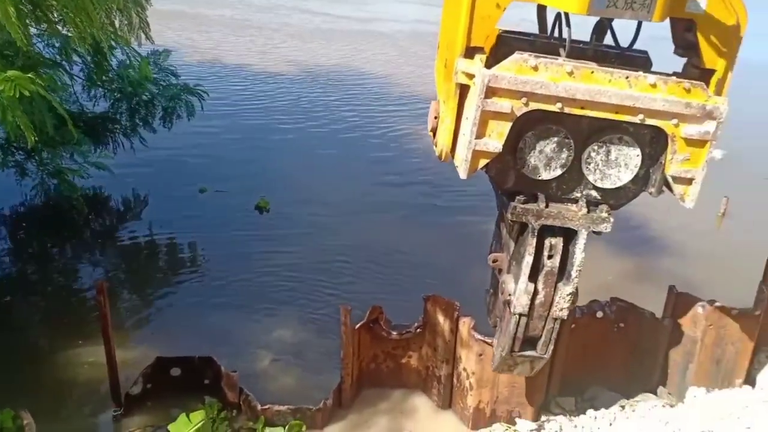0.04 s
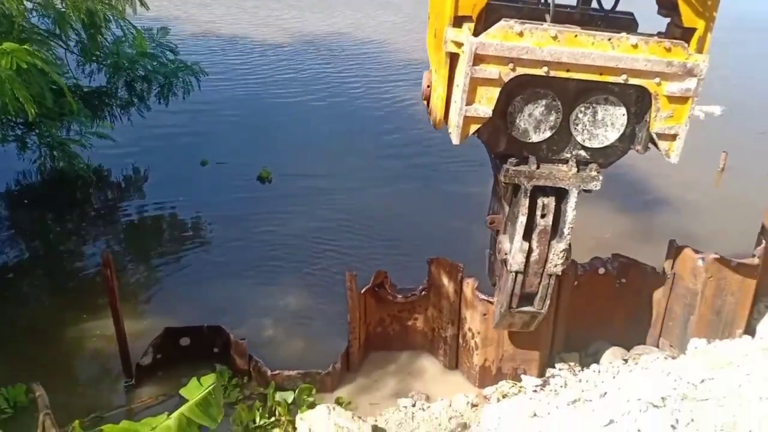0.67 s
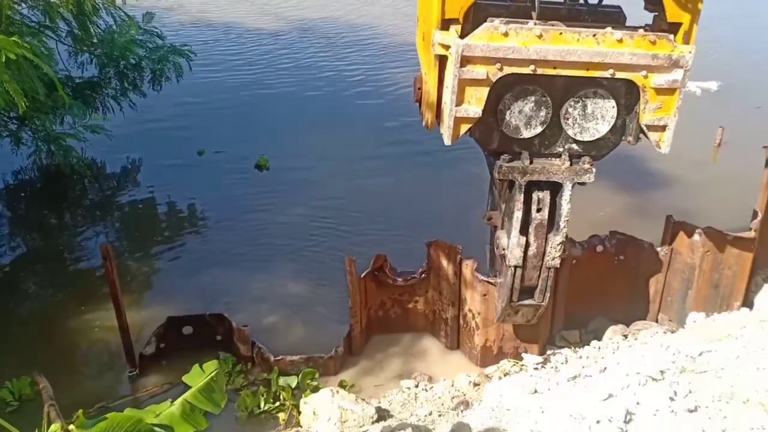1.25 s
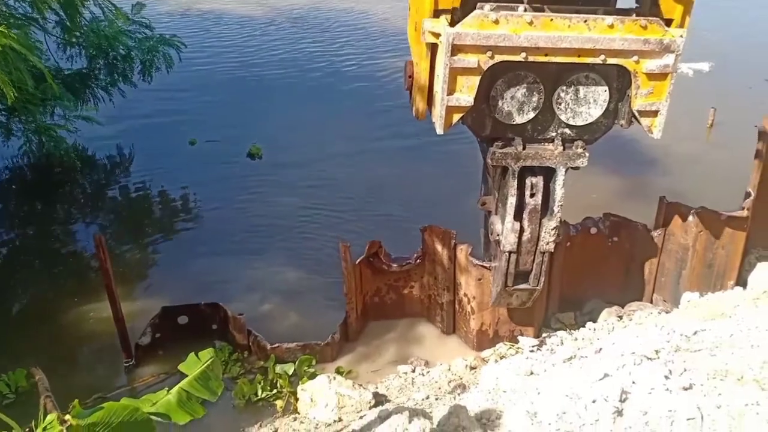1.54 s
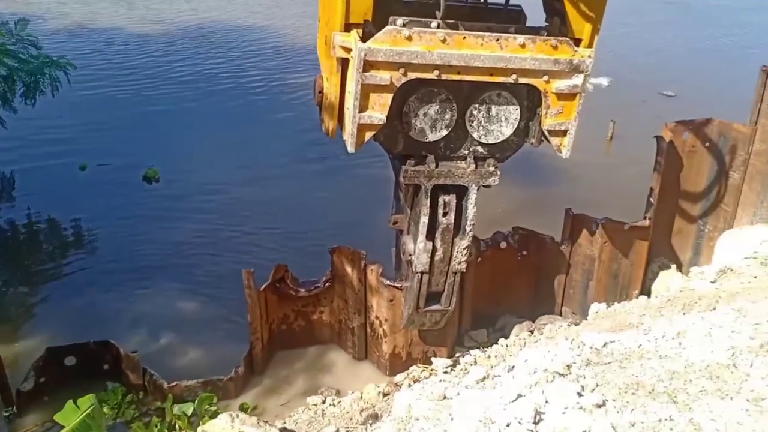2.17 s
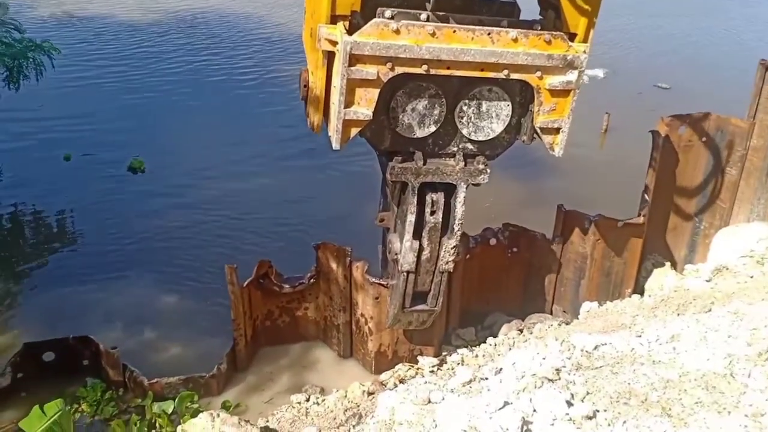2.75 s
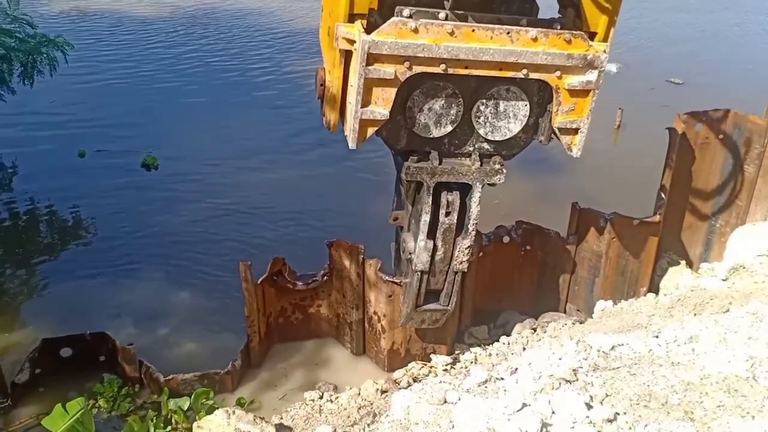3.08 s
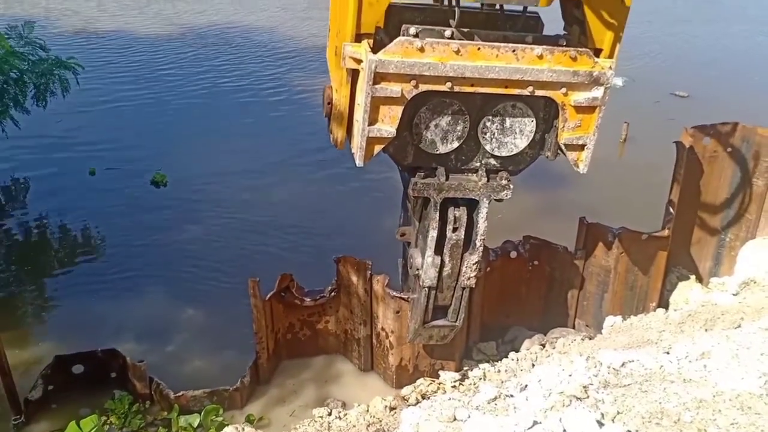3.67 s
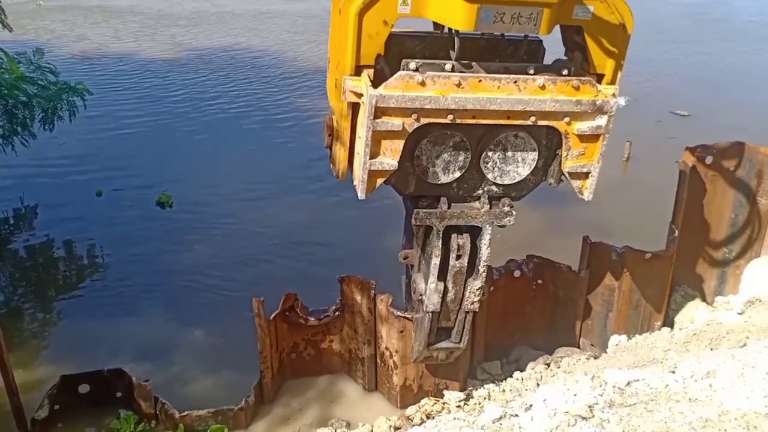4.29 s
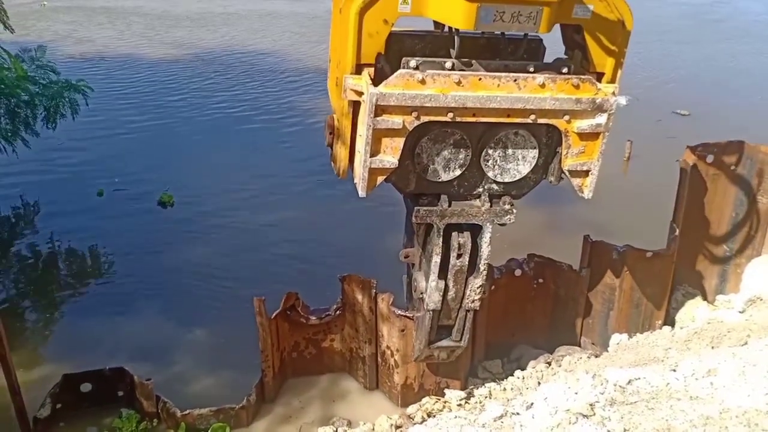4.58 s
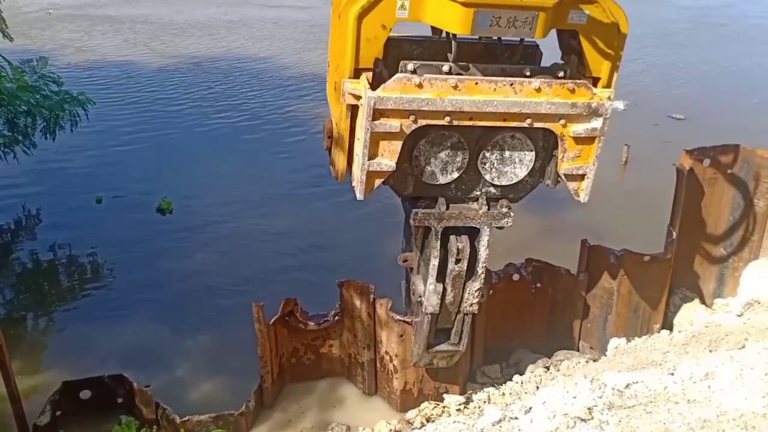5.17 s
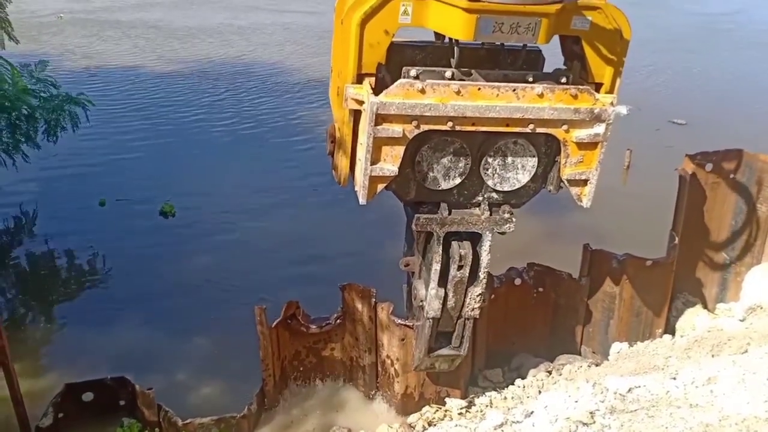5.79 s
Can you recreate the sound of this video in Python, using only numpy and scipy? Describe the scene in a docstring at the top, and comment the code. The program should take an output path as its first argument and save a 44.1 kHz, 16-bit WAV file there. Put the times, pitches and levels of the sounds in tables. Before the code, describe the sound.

An excavator runs steadily on a river bank, its diesel throbbing under a wavering hydraulic hum and whine. In front of the microphone, the pile driver's jaw knocks on a steel sheet pile, squeaks and rattles. More ringing knocks, crunchy scrapes and dull thuds follow, with two very faint distant chirps. Then the steel grinds louder, gives a few short squeaks and breaks into a quick judder.

```python
"""An excavator idles on a river bank: its diesel throbs and its hydraulic pump hums off to the left.
Almost at once the jaw of its pile driver knocks on a steel sheet pile, squeaks and rattles in its play.
More knocks, scrapes and dull thuds follow as it is worked on; twice a faint chirp comes from afar.
From 3.5 s the jaw bears down and the steel grinds, with a few short squeaks just after 5 s.
At 5.3 s the grind breaks into a judder of quick slips."""
import sys
import numpy as np
from scipy import signal
from scipy.fft import rfft, irfft
from scipy.io import wavfile
from scipy.ndimage import uniform_filter1d

SR = 44100
rng = np.random.default_rng(int(sys.argv[2]) if len(sys.argv) > 2 else 0)


def transcribe(u):
    """Save the signal u as a 16-bit wav file named by the first command-line argument.

    u: samples, shape (n,) or (channels, n), limited to [-1, 1]; the rate is SR.
    q: integer samples, one column per channel.
    """
    v = np.clip(np.atleast_2d(u).T, -1, 1)
    q = np.round(v * 32767).astype(np.int16)
    wavfile.write(sys.argv[1], SR, q)


N = 257103
T = np.arange(N) / SR
HZ = np.arange(N // 2 + 1) * SR / N
TOP_HZ = 15650

# square hits of the jaw and their rebounds: (time [s], level [dB], treble [dB], t60 [s], note [Hz])
JAW_KNOCKS = [(0.279, -17.5, -14, 0.083, 1840), (.322, -10, -15, 0.12, 540), (.36, -19, -18, 0.084, 1982),
              (.386, -21, -28, 0.073, 1604), (.399, -26, -22, 0.049, 1982), (0.465, -32.5, -23, .07, 1640),
              (0.704, -29.5, -19, .1, 1500), (.761, -14, -6.5, .13, 2410), (1.219, -19, -3.5, .13, 1174),
              (1.315, -18, -7, 0.16, 2120), (1.404, -15, 0.5, .13, 2134), (1.472, -27.5, -11, 0.092, 1980),
              (1.516, -9.5, 0.5, .13, 2686), (1.58, -26.5, -13, 0.11, 1725),
              (1.618, -22.5, -30, 0.18, 2330), (1.863, -23.5, 4, 0.084, 1642), (2.714, -23, -10, .14, 1750),
              (3.746, -22, -3, 0.12, 1868), (3.862, -27.5, -2, 0.084, 1420), (3.959, -28, -8, .07, 1740),
              (4.203, -32, -2, .07, 1610), (4.291, -25.5, 0, 0.11, 2218), (4.736, -21, 5.5, .055, 1780),
              (5.01, -27, -7, .08, 1680)]
# bright, crunchy skids: (time [s], level [dB], bass [dB], treble [dB], t60 [s], note [Hz])
JAW_SCRAPES = [(1.829, -28, -6, 7, 0.13, 1650), (1.855, -29, 0, 7, 0.11, 5080),
               (2.706, -15.5, 6.5, 2, 0.092, 2180), (3.662, -14, 6, 5, 0.13, 1680),
               (3.738, -28, -4, 0, .15, 2660), (3.858, -29, -11, -4, .12, 3020),
               (4.292, -28.5, -19, 1, .09, 2640), (4.432, -13.5, 0, 8.5, 0.13, 2550)]
# dull, pitched thuds as the pile shifts in the ground: (time [s], level [dB], t60 [s], note [Hz])
PILE_THUDS = [(.324, -24.5, 0.09, 851), (.358, -28, 0.06, 698), (.403, -30.5, 0.05, 572),
              (1.522, -22.5, 0.092, 528), (1.633, -27.5, .13, 1230), (2.148, -39, .12, 1370),
              (2.738, -35, .15, 850), (2.775, -37.5, 0.25, 1296), (4.118, -25.5, 0.092, 430.5),
              (4.441, -28, 0.11, 528), (4.465, -26, 0.24, 426)]
# steel sticking and slipping: (time [s], length [s], pitch [Hz], level [dB], relative octave level [dB])
STEEL_SQUEAKS = [(0.326, 0.094, 2884, -17.5, -32), (0.325, 0.055, 2330, -18, -43),
                 (.385, .03, 2335, -22.5, -43), (0.35, 0.061, 4370, -41, -35),
                 (5.057, .022, 2490, -23.5, -5), (5.1065, .0095, 2975, -13, -11),
                 (5.118, 0.011, 2940, -29, -5), (5.1532, 0.008, 3030, -15, -11.5)]
# the jaw rattling in its play: (time [s], level [dB])
JAW_CLINKS = [(.3235, -22), (.466, -37), (.555, -40.5), (1.62, -43), (1.645, -33), (1.857, -32),
              (1.872, -36)]
# swell of the grind as the jaw bears down: (time [s], level [dB])
GRIND_SWELL = [(3.5, -45), (3.9, -29), (4.25, -40), (4.75, -26), (5.1, -25), (5.35, -24), (5.65, -21.5),
               (5.83, -22.5)]
# tones in the clack of a slip: (frequency [Hz], level [dB])
CLACK_TONES = [(1705, -8), (1820, -4), (2065, 1.5), (2200, -3), (2600, -8)]
# loudness of the diesel: (time [s], level [dB])
ENGINE_LEVEL = [(0, -33.5), (.7, -33.5), (1.3, -29.5), (1.8, -31), (2.2, -29.5), (5.83, -28.5)]
# exhaust tones: (multiple of the crank rate [x], relative level [dB])
EXHAUST_TONES = [(2, 0.5), (3, -14.5), (4, 1), (5, -3.5), (6, -15.5), (7, -28), (8, -10), (11, -13),
                 (16, -59.5)]
# the pump's voice as its pressure shifts: (time [s], hum [dB], whine [dB])
PUMP_LEVELS = [(0, -33, -45), (.2, -35, -39), (.55, -36, -36), (1.55, -35, -33), (2.0, -31.5, -34),
               (2.13, -30.5, -29), (2.62, -30.5, -29.5), (2.85, -39.5, -29), (3.5, -34, -28.5),
               (3.95, -38, -28.5), (4.45, -37, -26), (4.68, -39.5, -37.5), (4.8, -42, -28), (5.2, -42, -27),
               (5.83, -41, -26.5)]
# high chirps: (time [s], length [s], first pitch [Hz], last pitch [Hz], level [dB])
FAR_CHIRPS = [(0.938, .036, 5900, 5750, -54), (3.022, .036, 5700, 6100, -52)]

# ringing steel of pile, jaw and engine casing: (frequency [Hz], level [dB], t60 [s])
PILE_MODES = [(440, -2, 0.34), (517, -8.5, 0.2), (695.3, -6, 0.51), (818, 0, 0.38), (947, -2.5, 0.18),
              (1166, -12.5, 0.65), (1332, -5, 0.26), (1732, 5.5, 0.069), (2078, 1, 0.099),
              (2162, 1.5, 0.09), (2190, -13, 0.084), (2580, -7, 0.06), (3870, -6, 0.06), (5120, -11, 0.04)]
JAW_MODES = [(693, -2, 0.39), (851, -5, 0.25), (1604, -3, 0.18), (1982, -2, 0.25), (2330, 4, 0.12),
             (2890, 0, 0.23), (3525, -26, .2), (4300, -24, .2), (5109, -20, .12)]
CASING_MODES = [(1063, 1, 0.56), (1700, -22, 0.17), (1860, -1, 0.16), (2007, 0, 0.19), (2150, -6.5, 0.27),
                (2585, -6, 0.42), (3820, -10.5, 0.087), (5130, -2.5, 0.043)]

# EQ curves of the noise layers: (frequency [Hz], relative level [dB])
CRACK_EQ = [(30, -32), (100, -10), (330, -13.5), (500, 0.5), (750, -2), (1100, 0), (1500, -6), (2300, 3),
            (2800, -6), (3300, -11.5), (4200, -15.5), (5200, -11.5), (6500, -21.5), (9000, -36),
            (15000, -31.5)]  # dry crack of a blow
GRIND_EQ = [(30, -14), (100, 8), (200, 5.5), (330, -7), (450, 8), (620, 3.5), (740, -5.5), (880, 10),
            (1100, -3), (1700, -3), (2100, -3.5), (2700, -5), (3400, -17), (5500, -27), (9000, -51),
            (15000, -67)]  # steel grinding under load
SLIP_EQ = [(300, -20.5), (900, 6), (1200, -8), (1480, -1), (1710, 0.5), (1900, -11), (2070, 1), (2300, -6),
           (2700, -4), (3300, -24.5), (5500, -22), (9000, -47)]  # bite of a slip
SLIP_THUD_EQ = [(30, -32), (100, -9), (220, 4), (330, -6), (480, 1), (600, 13), (720, -3), (860, 1),
                (1200, -12.5), (3000, -54)]  # the pile's answer to a slip
RUMBLE_EQ = [(20, -48), (45, -21), (70, -11.5), (105, -11.5), (150, -2), (200, -5.5), (270, -5),
             (340, -9.5), (450, -7.5), (600, -10.5), (800, -14), (1100, -28.5), (2500, -62.5)]  # low body of the diesel
CLATTER_EQ = [(300, -34), (800, 0), (1200, 0), (1600, -1), (2150, -1), (2700, -6), (3400, -13.5),
              (4300, -15), (5500, -12), (6600, -19.5), (8000, -27.5), (10000, -30), (13000, -24.5),
              (16000, -24.5)]  # its hard mechanical top


def blows():
    """Each blow is a crush of tiny impacts: a dry crack, the struck spot's tones and the pile's ring."""
    grit = air(scatter=1.0, corner_hz=1160) * unit(undb(2.0 * walk(700)))
    treble = signal.sosfiltfilt(signal.butter(2, 3600, "high", fs=SR, output="sos"), grit)
    bass = signal.sosfiltfilt(signal.butter(2, 850, fs=SR, output="sos"), grit)
    crack, notes = np.zeros((2, N)), np.zeros(N)
    jitter = 0.79 * walk(250)
    for start, db, rise, t60, bass_db, treble_db, note_hz, note_db in blow_cues():
        span = slice(int(start * SR), int(start * SR) + SR // 2)
        force = undb(db) * contact(start, rise, t60)[span]
        shelves = (undb(bass_db) - 1) * bass[:, span] + (undb(treble_db) - 1) * treble[:, span]
        crack[:, span] += force * (grit[:, span] + shelves)
        # every spot on the pile has its own clang and one main note
        clang = undb(-10.5) * partials(low_hz=959.4, high_hz=2868, count=6)
        clang += undb(treble_db - 22) * partials(low_hz=3400, high_hz=5600, count=4)
        note = undb(note_db) * np.sin(2 * np.pi * note_hz * T[span] + jitter[span])
        notes[span] += force * (clang + note)
    sound = undb(-2.5) * colour(crack, CRACK_EQ) + undb(1.5) * notes
    sound += undb(-11.5) * ring(crack, PILE_MODES)
    return place(sound, lag_ms=0.077, pan_db=-3.0)


def blow_cues():
    """Knocks snap, and ring purer when light; scrapes ease in; thuds are bassy with a strong note."""
    knock_rise_s, scrape_rise_s, thud_rise_s = 0.0017, 0.011, 0.008
    # (time [s], level [dB], rise [s], t60 [s], bass [dB], treble [dB], note [Hz], note level [dB])
    for start, db, treble_db, t60, hz in JAW_KNOCKS:
        yield start, db, knock_rise_s, t60, -2, treble_db, hz, -11.5 - 0.3225 * db
    for start, db, bass_db, treble_db, t60, hz in JAW_SCRAPES:
        yield start, db, scrape_rise_s, t60, bass_db, treble_db, hz, -5.5
    for start, db, t60, hz in PILE_THUDS:
        yield start, db - 5, thud_rise_s, t60, 18, -9, hz, 8


def grinding():
    """Loaded steel grinds, then slips about 24 times a second; the pile thuds just after each slip."""
    grit = air(scatter=0.4, corner_hz=1010) * unit(undb(1.8 * walk(400)))
    run = judder()
    steady = grit * undb(curve(GRIND_SWELL) + 0.47 * walk(20))
    slips = grit * sum(undb(db) * contact(start, rise=0.004, t60=0.07) for start, db, _ in run)
    thuds = grit * sum(undb(db) * contact(start, rise=0.014, t60=0.066) for start, _, db in run)
    sound = undb(-2.5) * colour(steady, GRIND_EQ) + undb(-8.5) * ring(steady, PILE_MODES)
    sound += undb(-2.5) * colour(slips, SLIP_EQ) + undb(-7.5) * clacks(run)
    sound += undb(-3.5) * colour(thuds, SLIP_THUD_EQ)
    return place(sound, lag_ms=0.056, pan_db=-2.5)


def judder():
    """Quickening slips that bite, hold and fade: (time [s], slip level [dB], thud level [dB])."""
    start_s, gap_s, quicken_s, hold_s = 5.312, 0.043, 0.0004, 0.22
    peak_db, fade_db_per_s, depth_db = -15, 118, 15
    slip = np.arange(13)
    age = gap_s * slip - quicken_s * slip * (slip - 1) / 2
    drop_db = np.clip(fade_db_per_s * (age - hold_s), 0, depth_db)
    drop_db[0] += 8.5  # the first slip is softer
    return list(zip(start_s + age, peak_db - drop_db, peak_db - 0.36 * drop_db))


def clacks(run):
    """Each slip chatters on the steel for a moment, at a slightly different spot."""
    out, jitter = np.zeros(N), 0.75 * walk(250)
    for start, db, _ in run:
        span = slice(int(start * SR), int(start * SR) + SR // 4)
        # two staggered attacks hold the peak for about 5 ms
        force = np.maximum(contact(start, rise=0.005, t60=0.059), contact(start, rise=0.01, t60=0.059))
        for hz, tone_db in CLACK_TONES:
            detune, offset = rng.standard_normal(2)
            cycles = hz * (1 + 0.011 * detune) * (T[span] - start) + offset
            out[span] += undb(db + tone_db) * force[span] * np.sin(2 * np.pi * cycles + jitter[span])
    return out


def squeaks():
    """The sliding jaw locks on to one note; stick-slip adds overtones and the steel rings on."""
    rise_s, fade_db = 0.0043, 9
    out = np.zeros(N)
    waver, rough = walk(700), undb(1.1 * walk(250))
    for start, length, hz, db, octave_db in STEEL_SQUEAKS:
        along = np.clip((T - start) / length, 0, 1)
        attack, release = np.clip((T - start) / rise_s, 0, 1), np.clip(3.5 * (1 - along), 0, 1)
        grip = attack * release * undb(db - fade_db * along)
        tail = undb(db - fade_db - 9) * contact(start + length / 2, rise=length / 2, t60=0.07)
        # the pitch is sharp and unsteady until the grip settles
        sharp = 0.02 * contact(start, rise=0.001, t60=0.012)
        unsteady = 0.002 + 0.016 * contact(start, rise=0.002, t60=0.1)
        phase = 2 * np.pi * hz * np.cumsum(1 + sharp + unsteady * waver) / SR
        upper = sum(np.sin(k * phase) for k in range(3, 6) if k * hz < TOP_HZ)
        overtones = undb(octave_db) * (np.sin(2 * phase) + undb(-25) * upper)
        out += (grip + tail) * (np.sin(phase) + overtones)
    return place(np.sqrt(2) * out * rough, lag_ms=0.071, pan_db=-9.5)


def clinks():
    """The loose jaw hits its stops and rings."""
    rattle = sum(undb(db) * strike(JAW_MODES, start) for start, db in JAW_CLINKS)
    return place(rattle, lag_ms=0.062, pan_db=-5.5)


def diesel(turns):
    """Four cylinders, two firings a turn: exhaust tones, puffs of rumble, clatter ringing the casing."""
    tones = sum(undb(db + 0.14 * walk(5.4)) * np.sin(2 * np.pi * (multiple * turns + rng.random()))
                for multiple, db in EXHAUST_TONES)
    firing, uneven = np.cos(4 * np.pi * turns), np.cos(2 * np.pi * turns)
    puffs = air(scatter=0.49, corner_hz=613) * unit(1 + 0.17 * firing + 0.33 * uneven)
    taps = air(scatter=0.76, corner_hz=2200) * unit(1 + 0.038 * firing + 0.041 * uneven)
    throb = undb(-1.0) * tones + undb(1.37) * colour(puffs, RUMBLE_EQ)
    clatter = undb(-6) * colour(taps, CLATTER_EQ) + undb(-13.5) * ring(taps, CASING_MODES)
    sound = place(throb, lag_ms=0.33, pan_db=0.5)
    sound += place(clatter * undb(1.05 * walk(7.94)), lag_ms=0.453, pan_db=0.0)
    return sound * undb(curve(ENGINE_LEVEL))


def pump(turns):
    """Nine pistons pulse the oil: a wavering hum, its octave whine and a third harmonic that follows."""
    strokes = 9 * turns + 0.018 * walk(14)
    hum_db, whine_db = curve(PUMP_LEVELS), curve(PUMP_LEVELS, column=2)
    third_db = -38 + 0.3 * (whine_db - whine_db.mean())
    levels = [hum_db + 1.7 * walk(17), whine_db + 0.5 * walk(16), third_db + 0.74 * walk(16)]
    hum, whine, third = [np.sqrt(2) * undb(db) * np.sin(2 * np.pi * (k * strokes + rng.random()))
                         for k, db in enumerate(levels, 1)]
    return place(hum + third, lag_ms=0.23, pan_db=-0.5) + place(whine, lag_ms=0.27, pan_db=4.5)


def chirps():
    """Thin, rough, gliding whistles above the engine, perhaps a far bird."""
    out, waver = np.zeros(N), 1 + 0.012 * walk(600)
    for start, length, first_hz, last_hz, db in FAR_CHIRPS:
        along = np.clip((T - start) / length, 0, 1)
        hz = (first_hz + (last_hz - first_hz) * along) * waver
        out += undb(db) * np.sin(np.pi * along) * np.sin(2 * np.pi * np.cumsum(hz) / SR)
    return 2 * out


def contact(start, rise, t60):
    """Force of one contact: a linear attack, then an exponential decay."""
    age = T - start
    return np.clip(age / rise, 0, 1) * np.exp(-np.log(1000) * np.clip((age - rise) / t60, 0, 2))


def strike(modes, start):
    """Modes set ringing by one sharp tap."""
    age = np.clip(T - start, 0, 1)
    return sum(undb(db) * np.sin(2 * np.pi * hz * age) * np.exp(-np.log(1000) * age / t60)
               for hz, db, t60 in modes)


def ring(force, modes):
    """Steel modes resonate under a force; white noise keeps its power."""
    response = strike(modes, 0)[:SR // 2]
    return signal.fftconvolve(force, response[None] / np.linalg.norm(response), axes=1)[:, :N]


def partials(low_hz, high_hz, count):
    """Half a second of random steel tones spread over a band, with rms 1."""
    spot, offset = rng.random((count, 2)).T
    hz = low_hz + (high_hz - low_hz) * (np.arange(count) + spot) / count
    cycles = hz[:, None] * T[:SR // 2] + offset[:, None]
    return np.sqrt(2 / count) * np.sin(2 * np.pi * cycles).sum(axis=0)


def air(scatter, corner_hz):
    """Stereo noise: centred in the bass, widening above the corner by the scattered share."""
    common, left, right = rfft(rng.standard_normal((3, N)))
    share = scatter * HZ ** 2 / (HZ ** 2 + corner_hz ** 2)
    return irfft(np.sqrt(1 - share) * common + np.sqrt(share) * np.array([left, right]), N)


def colour(x, eq):
    """Minimum-phase EQ that keeps attacks crisp; white noise keeps its power."""
    hz, db = np.transpose(eq)
    gain = unit(undb(np.interp(np.log(HZ + 1), np.log(hz), db)))
    cepstrum = irfft(np.log(gain), N)
    cepstrum[1:N // 2] *= 2
    cepstrum[N // 2 + 1:] = 0
    return irfft(rfft(x) * np.exp(rfft(cepstrum)), N)


def place(x, lag_ms, pan_db):
    """Stereo position: the right ear hears it later; pan is left minus right."""
    left, right = np.broadcast_to(x, (2, N))
    right = irfft(rfft(right) * np.exp(-2j * np.pi * HZ * lag_ms / 1000), N)
    return np.array([left * undb(pan_db / 2), right * undb(-pan_db / 2)])


def walk(rate_hz):
    """Smooth random wander with rms 1."""
    hold = int(SR / rate_hz)
    steps = np.repeat(rng.standard_normal(N // hold + 2), hold)
    return unit(uniform_filter1d(uniform_filter1d(steps, hold), hold)[:N])


def curve(rows, column=1):
    """Fader ride through one column of a time table."""
    rows = np.array(rows)
    return np.interp(T, rows[:, 0], rows[:, column])


def undb(db):
    """Decibels to gain."""
    return 10 ** (np.asarray(db) / 20)


def unit(x):
    """Scale to rms 1."""
    return x / np.sqrt(np.mean(x ** 2))


def scene():
    """The crankshaft recovers from a slight sag and drives engine and pump; the jaw works in front."""
    idle_hz, sag_hz, settle_s = 32.14, 0.19, 0.5
    crank_hz = idle_hz - sag_hz * np.exp(-T / settle_s)
    turns = np.cumsum(crank_hz * (1 + 0.001006 * walk(5.994))) / SR
    return diesel(turns) + pump(turns) + blows() + clinks() + squeaks() + grinding() + chirps()


def record(dry):
    """Thin the deepest bass, round the loudest peaks and cut the top."""
    thin = signal.sosfilt(signal.butter(2, 36, "high", fs=SR, output="sos"), dry)
    rounded = thin / (1 + thin ** 6) ** (1 / 6)
    return signal.sosfilt(signal.ellip(10, 0.2, 80, TOP_HZ, fs=SR, output="sos"), rounded)


dry = scene()
out = record(dry)
transcribe(out)
```